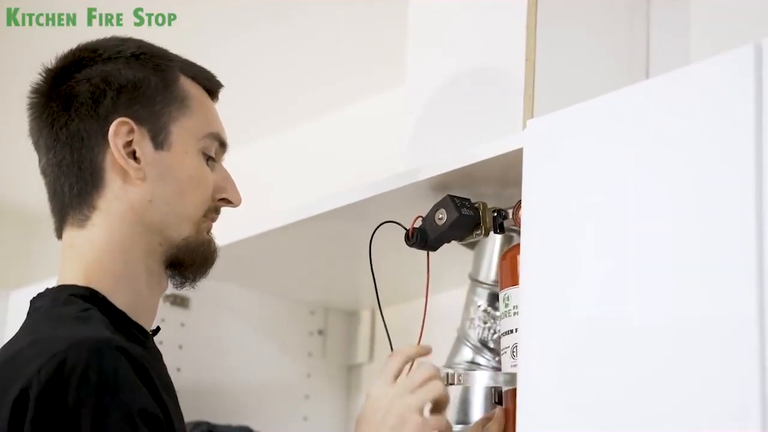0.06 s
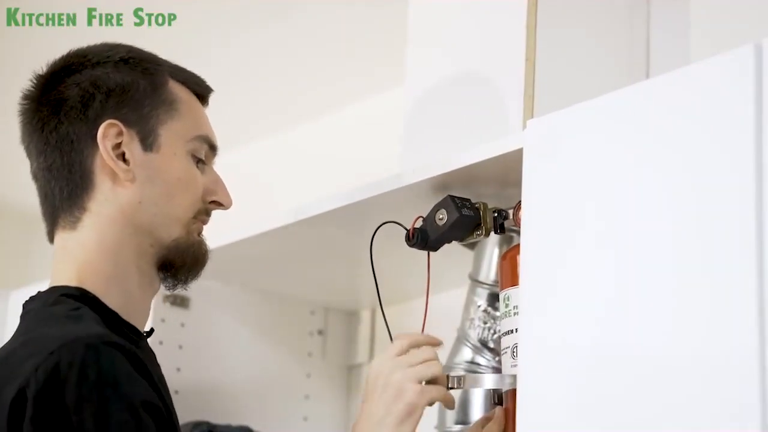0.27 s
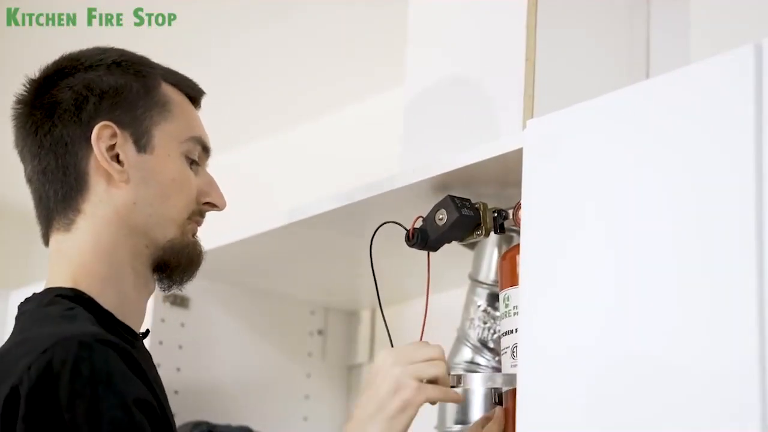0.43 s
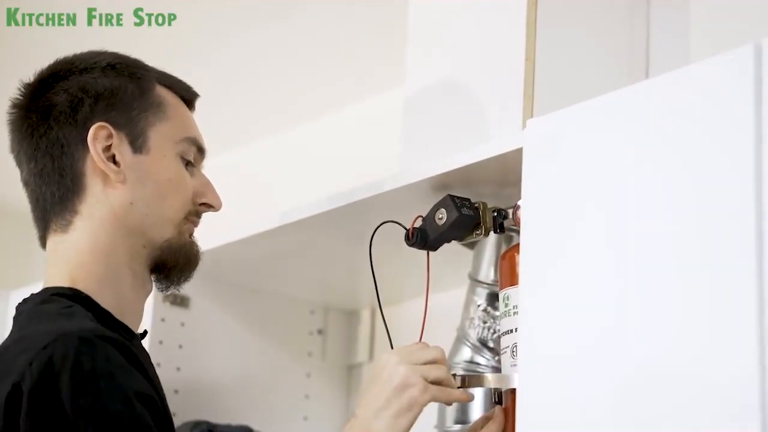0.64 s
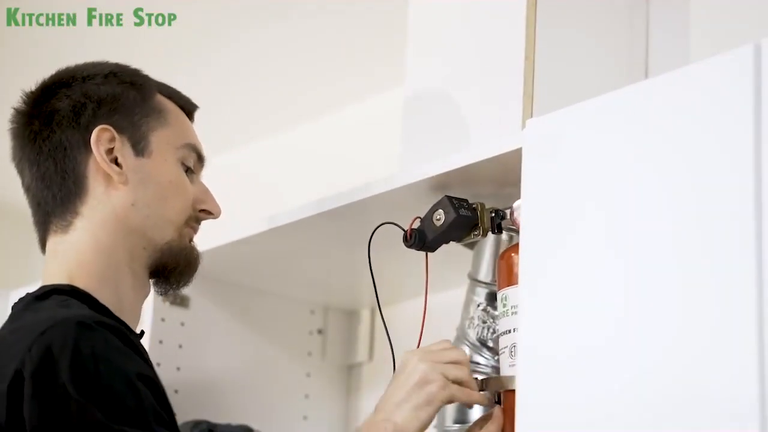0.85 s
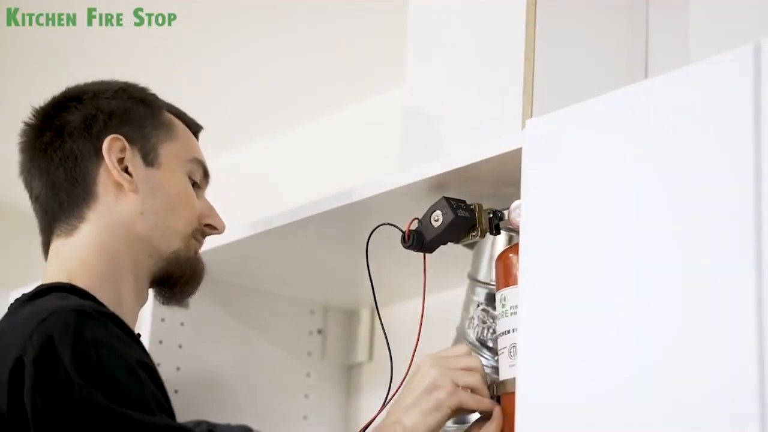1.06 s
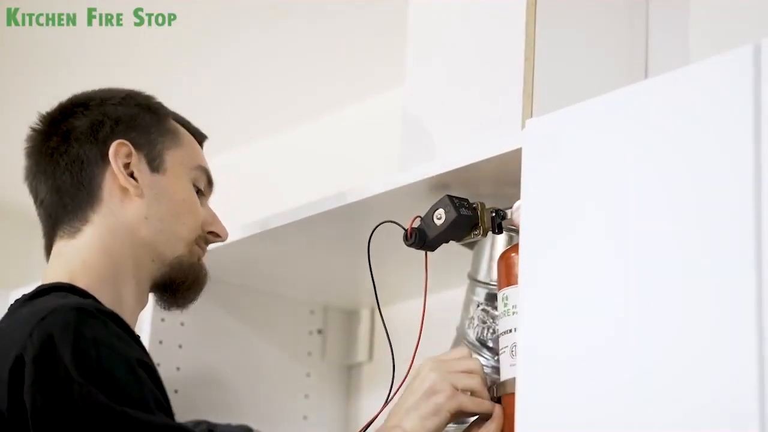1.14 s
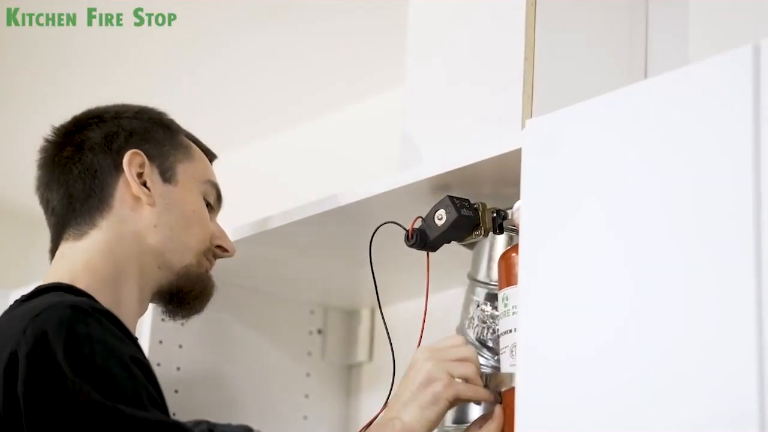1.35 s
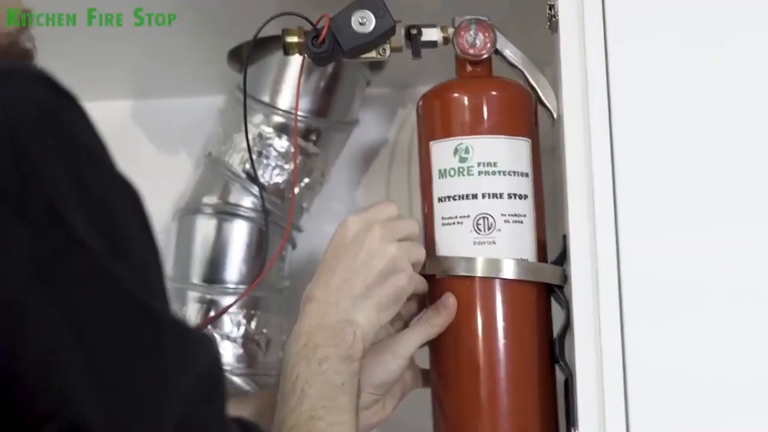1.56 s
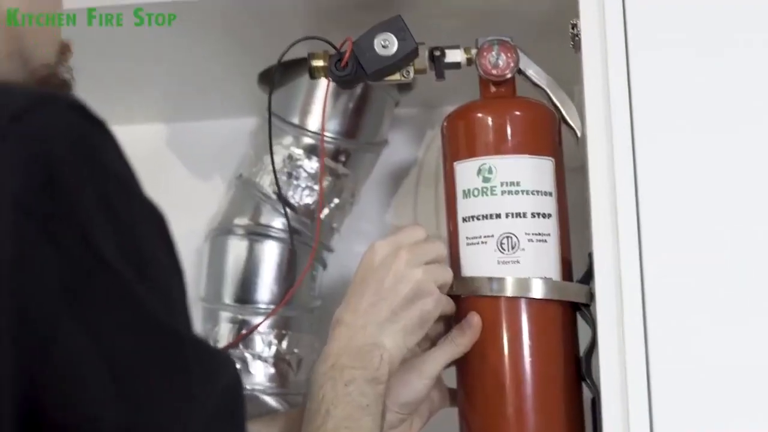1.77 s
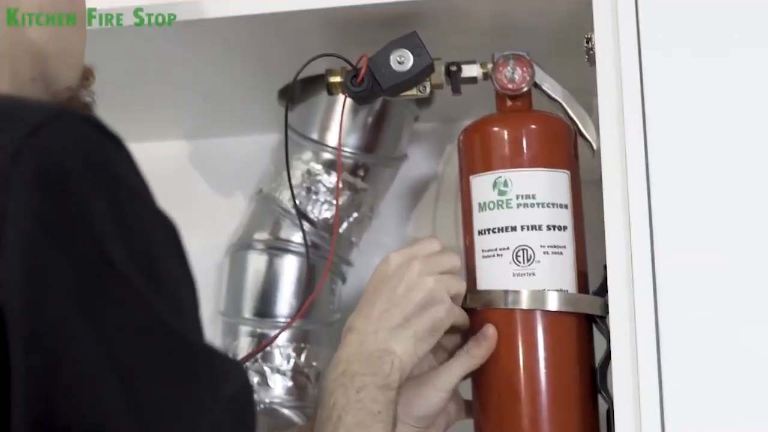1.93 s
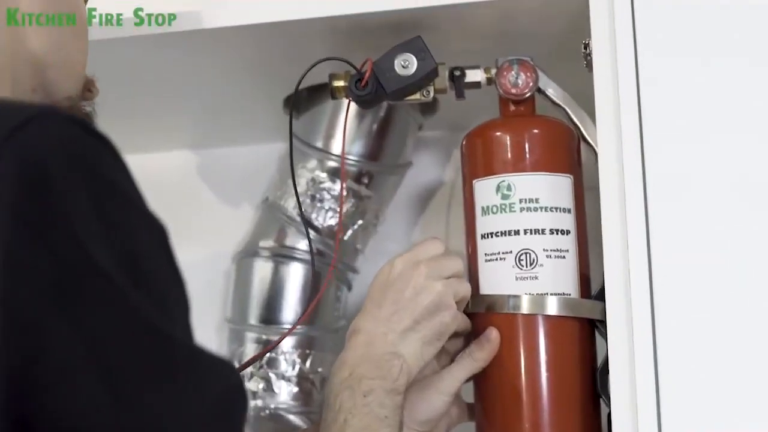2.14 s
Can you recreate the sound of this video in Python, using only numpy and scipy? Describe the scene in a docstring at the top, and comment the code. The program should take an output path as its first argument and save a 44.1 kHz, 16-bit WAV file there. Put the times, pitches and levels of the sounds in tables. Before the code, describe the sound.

A metal strap rasps through its buckle in one quick pull. Hands knock softly in a cabinet, the buckle snaps, and the band clacks against a fire extinguisher, heard from a distance in a bare, echoing room.

```python
"""Strapping a gas cylinder

An open wall cabinet in a bare room, the stereo microphone far enough off to hear more echo than
direct sound. A steel strap rasps through its buckle in one quick pull, a run of tiny catches that
ring strap and cylinder; the buckle snaps, then the band clacks against the cylinder. Hands bump and
knock the cabinet, a loose part pings; a sleeve, room noise and a faint whine lie underneath."""
import sys
import numpy as np
from scipy import signal
from scipy.fft import rfft, irfft, next_fast_len
from scipy.io import wavfile
from scipy.ndimage import uniform_filter1d

SR = 44100
rng = np.random.default_rng(int(sys.argv[2]) if len(sys.argv) > 2 else 0)


def log_audio(samples):
    """Write samples as a 16-bit WAV file to the path given in sys.argv[1]."""
    # one column per channel
    frames = np.atleast_2d(samples).T
    # limit to full scale, then quantise
    limited = np.clip(frames, -1, 1)
    pcm = np.round(limited * 32767).astype(np.int16)
    wavfile.write(sys.argv[1], SR, pcm)


N = 97020
TIME = np.arange(N) / SR


def from_db(db):
    """Decibels to gain."""
    return 10 ** (np.asarray(db) / 20)


def rms_one(x):
    """Scale to unit rms."""
    return x / np.sqrt(np.mean(x ** 2) + 1e-20)


def level(curve):
    """Gain over time from (time [s], level [dB]) points."""
    return from_db(np.interp(TIME, *np.transpose(curve), left=-120))


def at_hz(points, hz):
    """Read a table on a log-frequency axis."""
    freqs, values = np.transpose(points)
    return np.interp(np.log(np.maximum(hz, 1)), np.log(freqs), values)


def colour(x, points):
    """Minimum-phase equaliser through (frequency [Hz], gain [dB]) points."""
    size = 2 * next_fast_len(x.shape[-1] // 2 + SR // 10)
    gain = from_db(at_hz(points, np.fft.rfftfreq(size, 1 / SR)))
    cepstrum = irfft(np.log(gain))
    cepstrum[1:size // 2] *= 2
    cepstrum[size // 2 + 1:] = 0
    return irfft(rfft(x, size) * np.exp(rfft(cepstrum)))[..., :x.shape[-1]]


def evened(x, width_hz):
    """Flatten chance bumps of the spectrum that are wider than width_hz."""
    size = x.shape[-1]
    power = np.mean(np.abs(rfft(np.atleast_2d(x))) ** 2, axis=0) + 1e-20
    power = uniform_filter1d(power, int(width_hz * size / SR) + 1)
    excess_db = 10 * np.log10(power / power.mean())
    return colour(x, np.c_[np.fft.rfftfreq(size, 1 / SR), -excess_db][1:])


def ring(x, modes):
    """Parallel resonances of (frequency [Hz], bandwidth [Hz], peak gain [dB])."""
    out = 0
    for hz, width, db in modes:
        radius = np.exp(-np.pi * width / SR)
        poles = [1, -2 * radius * np.cos(2 * np.pi * hz / SR), radius ** 2]
        mode = signal.lfilter([1, 0, -1], poles, x + 1e-18 * TIME)
        out = out + from_db(db) * (1 - radius ** 2) / 2 * mode
    return out


def soften(force, cutoff_hz):
    """A cushioned contact passes little above its cutoff."""
    return signal.sosfilt(signal.butter(2, cutoff_hz, fs=SR, output="sos"), force + 1e-18)


def stereo_noise(width, size):
    """White noise in two channels, its width given as (frequency [Hz], side minus mid [dB])."""
    mid, side = rfft(rng.standard_normal((2, size)))
    share = from_db(at_hz(width, np.fft.rfftfreq(size, 1 / SR)))
    return irfft((mid + share * side * [[1], [-1]]) / np.hypot(1, share), size)


# spread of sleeve and echoes at the microphone: (frequency [Hz], side minus mid [dB])
ROOM_SPREAD = [(60, -53), (200, -24), (380, -13), (700, -8.5), (1300, -5.5), (2400, -1.5), (4400, -0.5),
               (15000, -3)]
# sleeve as it reaches the microphone: (time [s], level [dB])
SLEEVE_LEVEL = [(0, -57.5), (.2, -58.5), (.35, -61), (.85, -58.5), (1.0, -66.5), (1.35, -66.5), (1.55, -67),
                (1.8, -67.5), (2.2, -65)]
# tone of the cloth: (frequency [Hz], gain [dB])
SLEEVE_TONE = [(40, -14.5), (120, -5), (350, 0), (700, -11), (1100, -9), (2000, -12.5), (5000, -19),
               (15000, -25.5)]
def sleeve():
    """A sleeve rustles: soft noise that swells and sinks."""
    return level(SLEEVE_LEVEL) * rms_one(colour(stereo_noise(ROOM_SPREAD, N), SLEEVE_TONE))


# room noise all round the microphone: (frequency [Hz], gain [dB])
HUSH_TONE = [(12, -42), (20, 1), (174, -5), (263, -12), (328, -13), (445, -12), (620, -10.5), (1110, -12.5),
             (1780, -15), (1990, -17), (2410, -19.5), (4690, -20), (15000, -26.5)]
# its spread: (frequency [Hz], side minus mid [dB])
HUSH_SPREAD = [(60, -23), (110, -10), (200, -7.5), (380, 1.5), (700, -2), (2400, -0.5), (4400, 1),
               (15000, -2)]
def room_tone(hush_db=-60.5, whine_db=-75, whine_hz=15649):
    """The room's low, steady hush and a thin electrical whine."""
    hush = rms_one(colour(stereo_noise(HUSH_SPREAD, N), HUSH_TONE))
    whine = rms_one(np.sin(2 * np.pi * whine_hz * TIME))
    return from_db(hush_db) * hush + from_db(whine_db) * whine


# soft hand bumps at the cabinet: (time [s], level [dB])
HAND_BUMPS = [(.122, -18), (0.189, -15), (.285, -48), (0.361, -24), (.452, -16.5), (.512, -24.5),
              (0.553, -25), (1.412, -14), (1.471, -22), (1.686, -23.5), (2.16, -10), (2.175, -8)]
# ring of the cabinet panels: (frequency [Hz], bandwidth [Hz], gain [dB])
PANEL_RING = [(43.3, 22, 15), (75, 29, 21.5), (108.7, 18, 15.5), (172, 13, 15), (356, 230, 0.5)]
def bumps(palm_hz=420):
    """Soft palms push on the cylinder and the cabinet panels thud."""
    force = np.zeros(N)
    for start, db in HAND_BUMPS:
        force[int(start * SR)] += from_db(db)
    return ring(soften(force, palm_hz), PANEL_RING)


def catches(per_s, envelope, spread_db=3.0):
    """Force of tiny random contacts of uneven size under an envelope."""
    size = len(envelope)
    strengths = from_db(spread_db * np.minimum(rng.exponential(1, size), 4))
    signs = rng.choice([-1, 1], size)
    touching = rng.random(size) < per_s / SR
    return evened(rms_one(strengths * signs * touching) * envelope, width_hz=50)


# ring of strap and cylinder, by place of contact:
# (frequency [Hz], bandwidth [Hz], gain when pulled [dB], at the buckle [dB], at the band [dB])
STRAP_RING = [(279.5, 11.5, 17, -21, -20), (335, 16, 3.5, -28, -20), (611, 17, 14, 2, -16),
              (1020, 140, 0, -2.5, -14), (1630, 67, 7, 0, 6.5), (1730, 50, 11, 3, 8),
              (2440, 38, -2, -20, 11.5), (3203, 59, 5.5, -6, 10), (4180, 44, 4.5, 8, -14),
              (4200, 28, 8.5, 3, -14), (4765, 105, 1.5, 4.5, 8.5), (4970, 12, 8, -11, -7),
              (5773, 20, 7.5, -7, -8), (6425, 72, -17, 12, -4), (7170, 33, 4, 7, -7),
              (7430, 77, -2, 6, 8.5), (7600, 19, 11.5, -18, 2), (8170, 114, 2, 8, 3),
              (8380, 84, -20, -5, 4), (8807, 20, -3, -13, 5), (9140, 25, 11, -4, 5), (9790, 20, 3, -17, -8),
              (10300, 22, 9, -15, -17), (11400, 210, -26, 1, -14), (14500, 200, -17, 5, -9)]
# tone of the contact at each place: (frequency [Hz], gain [dB])
PULL_TONE = [(60, -20), (200, -19.5), (280, -10.5), (480, -11.5), (780, -13), (1100, -2), (1450, -5.5),
             (2100, -5), (2600, 1), (5500, 0.5), (10500, 0), (12000, -2.5), (15500, -6)]
BUCKLE_TONE = [(60, 4), (300, -6), (700, -4.5), (1500, -3), (2600, -3.5), (4000, -2), (6000, -4.5),
               (10000, -5.5), (15500, -8.5)]
BAND_TONE = [(60, -10), (400, -6), (900, -4), (1500, -1.5), (3000, -1), (6000, -1.5), (8500, 0.5),
             (11000, -4.5), (14000, -10), (15500, -22)]
PULLED, BUCKLE, BAND = 0, 1, 2
def strap(force, place):
    """The crack of a contact on the steel, plus the modes it reaches from that place."""
    modes = [(hz, width, gains[place]) for hz, width, *gains in STRAP_RING]
    tone = (PULL_TONE, BUCKLE_TONE, BAND_TONE)[place]
    return colour(force + ring(force, modes), tone)


# the pull at the buckle, hardest in the middle and near the end: (time [s], level [dB])
PULL_LEVEL = [(.216, -65), (.2195, -27.5), (.24, -25.5), (.257, -21.5), (.272, -29.5), (.287, -37),
              (.291, -24.5), (.304, -25.5), (.316, -36.5), (.335, -38)]
def pull():
    """The strap rasps through the buckle, catching and slipping."""
    end = PULL_LEVEL[-1][0]
    force = catches(per_s=2200, envelope=level(PULL_LEVEL) * (TIME < end))
    return strap(force, PULLED)


def chatter(start, db, decay_s):
    """One blow: a fast-dying run of contacts."""
    run = catches(per_s=5000, envelope=np.exp(-TIME[:SR // 5] / decay_s))
    blow = from_db(db) * run / np.linalg.norm(run)
    return np.pad(blow, (int(start * SR), N))[:N]


# steel on steel in the cabinet: (time [s], level [dB], decay [s], place [0 pulled, 1 buckle, 2 band])
STEEL_BLOWS = [(0.2883, 4, 0.0055, 0), (.299, 2, 0.0045, 0), (1.402, -12, 0.0041, 1),
               (1.4054, -5.5, 0.0025, 1), (1.416, -15, 0.0085, 1), (1.9964, -8, 0.0093, 2),
               (2.014, -16.5, 0.0055, 2), (2.036, -26, 0.0037, 2), (2.093, -19, 0.009, 2),
               (2.159, -23.5, 0.0045, 2)]
def clacks():
    """The strap jerks tight, the buckle snaps, the band hits the cylinder."""
    out = 0
    for place in (PULLED, BUCKLE, BAND):
        force = sum(chatter(start, db, decay) for start, db, decay, at in STEEL_BLOWS if at == place)
        out = out + strap(force, place)
    return out


# duller knocks in the cabinet: (time [s], level [dB], decay [s], cutoff [Hz])
FITTING_KNOCKS = [(.305, 1.5, 0.013, 1100), (.668, -16, .028, 4200), (0.821, -25, 0.043, 1000),
                  (1.253, -20.5, .015, 1400), (2.032, -12, 0.041, 1000), (2.156, -8.5, 0.0071, 1430)]
# ring of the fittings: (frequency [Hz], bandwidth [Hz], gain [dB])
FITTING_RING = [(412, 50, 4.5), (814, 23, -1), (1100, 190, 3), (1388, 39, 12.5), (1690, 300, 3),
                (2290, 120, 6)]
def knocks():
    """Cushioned blows set the fittings ringing briefly."""
    force = sum(soften(chatter(start, db, decay), hz) for start, db, decay, hz in FITTING_KNOCKS)
    return force + ring(force, FITTING_RING)


def clink(start_s=2.09, hz=3730, gain_db=-43, decay_s=0.006):
    """A small loose part pings on one note, dry and centred."""
    age = np.maximum(TIME - start_s, 0)
    envelope = age / decay_s * np.exp(-age / decay_s)
    return from_db(gain_db) * envelope * np.sin(2 * np.pi * hz * age)


# tail of the bare room: (frequency [Hz], time to fall 60 dB [s])
ROOM_DECAY = [(100, 0.72), (300, 0.66), (1000, .8), (2000, 0.84), (4500, 0.79), (8000, 0.68), (11000, 0.47),
              (15000, 0.3)]
def room(x, direct_db=-10.5, cabinet_db=-2, room_db=-4, cabinet_t60_s=0.21, build_up_s=0.0015):
    """Cabinet to microphone: direct sound, quick cabinet echoes and a tail whose treble dies first."""
    age = TIME[:SR]
    hz = np.fft.rfftfreq(SR, 1 / SR)
    spectrum = rfft(stereo_noise(ROOM_SPREAD, SR))
    cabinet = from_db(-60 * age / cabinet_t60_s)
    cabinet *= from_db(cabinet_db) / np.linalg.norm(cabinet)
    response = 0
    for centre, t60 in ROOM_DECAY:
        band = at_hz([(f, f == centre) for f, _ in ROOM_DECAY], hz)
        tail = from_db(-60 * age / t60)
        tail *= from_db(room_db) / np.linalg.norm(tail)
        response = response + irfft(spectrum * band, SR) * np.hypot(cabinet, tail)
    response *= 1 - np.exp(-age / build_up_s)
    response[:, 0] += from_db(direct_db)
    return signal.fftconvolve(x[None], evened(response, width_hz=22), axes=1)[:, :N]


def scene():
    """The work at the cabinet, heard from out in the room."""
    handling = pull() + clacks() + knocks() + bumps()
    return room(handling) + clink() + sleeve() + room_tone()


def record(dry, cutoff_hz=15750):
    """The microphone's signal, with the highest treble cut steeply."""
    return signal.sosfilt(signal.ellip(12, .1, 80, cutoff_hz, fs=SR, output="sos"), dry)


dry = scene()
out = record(dry)
log_audio(out)
```